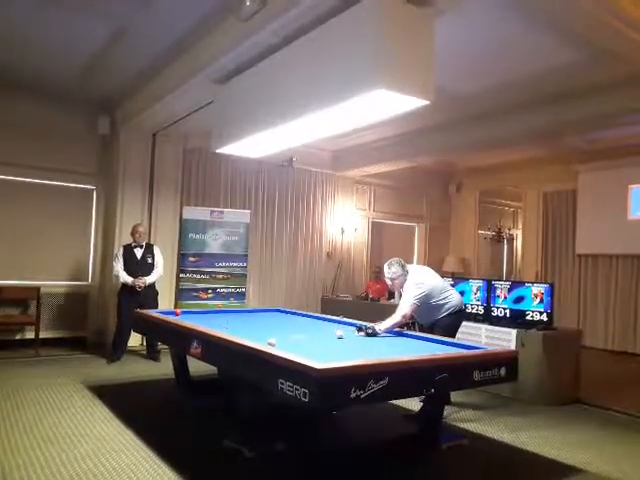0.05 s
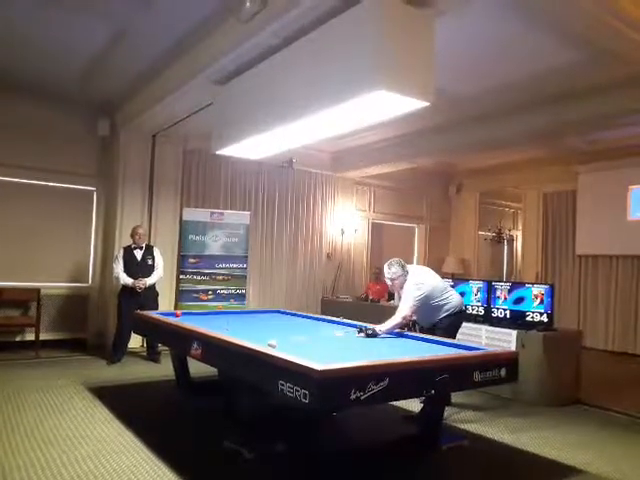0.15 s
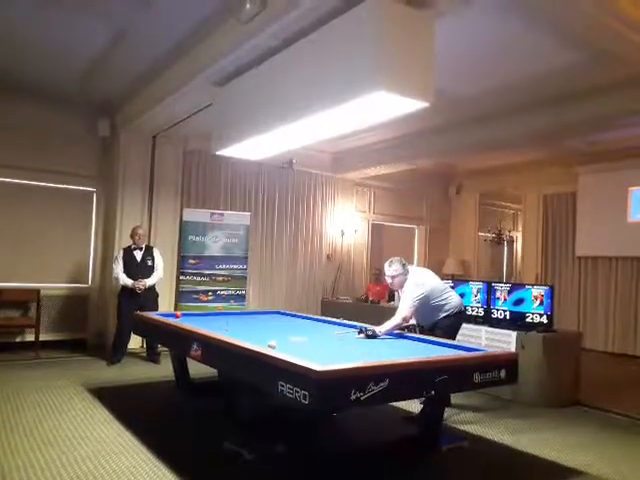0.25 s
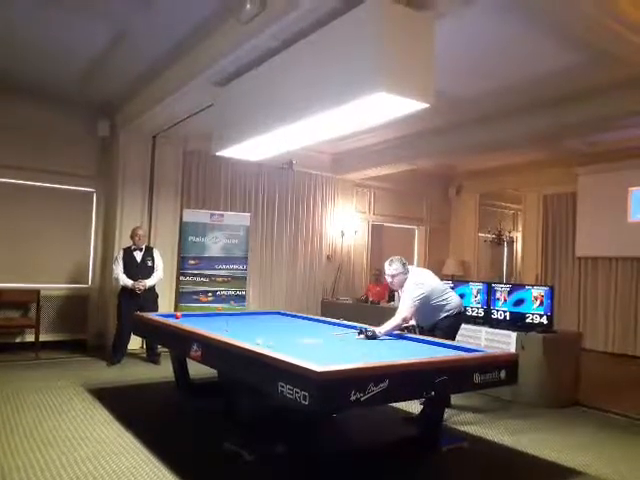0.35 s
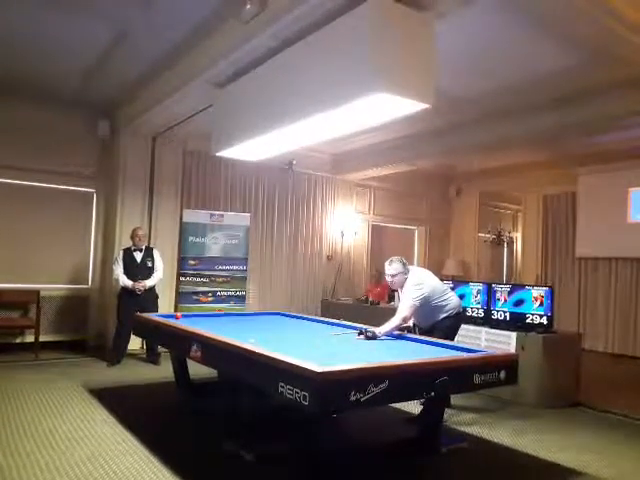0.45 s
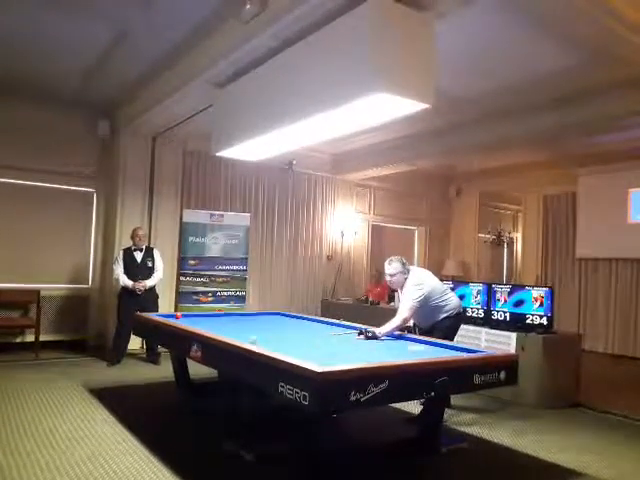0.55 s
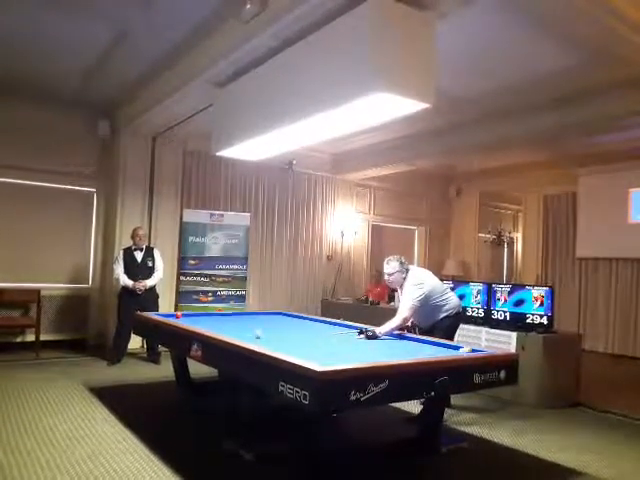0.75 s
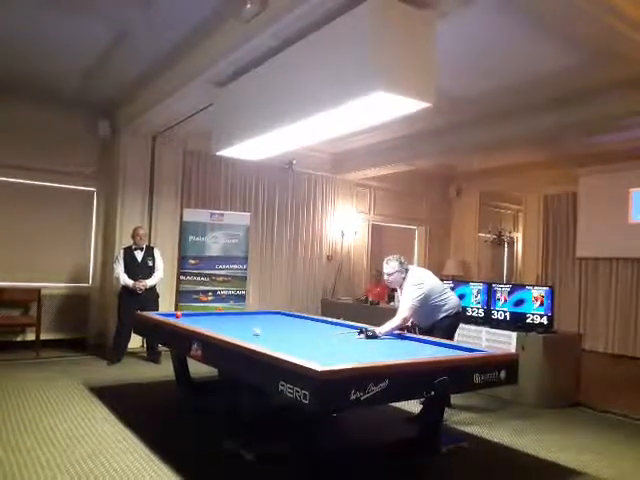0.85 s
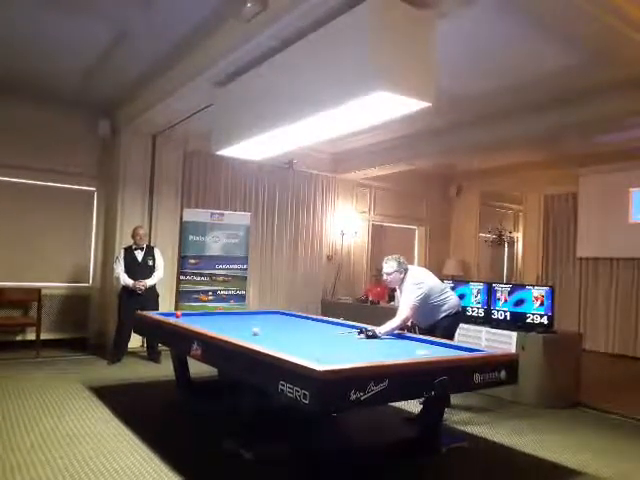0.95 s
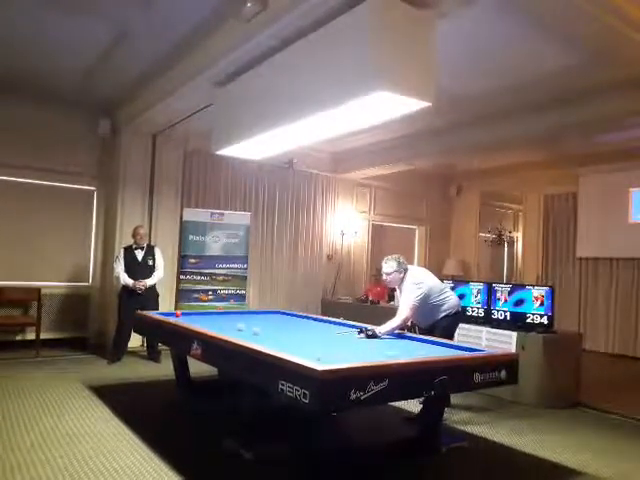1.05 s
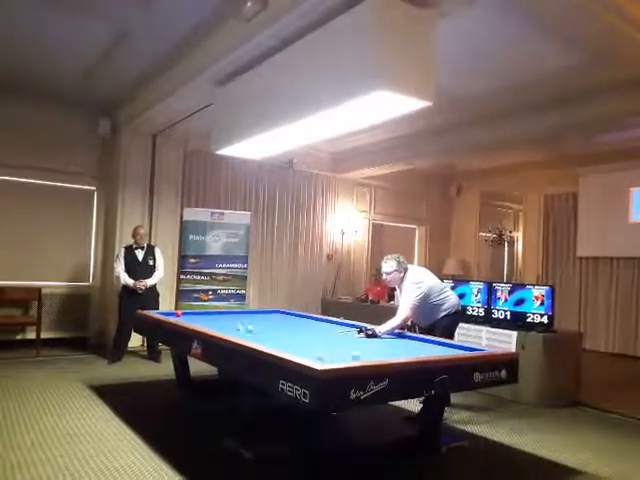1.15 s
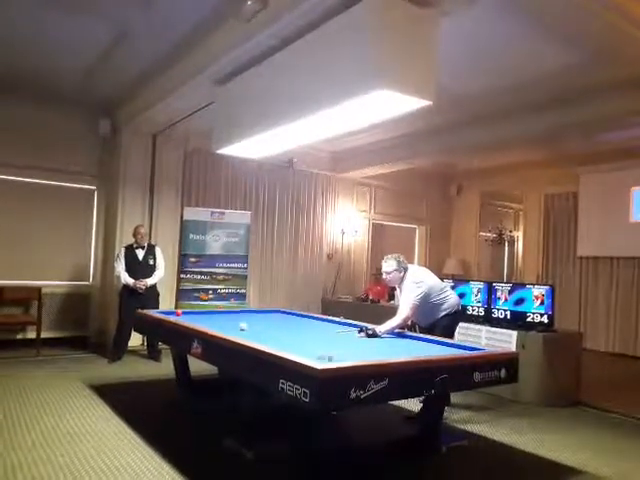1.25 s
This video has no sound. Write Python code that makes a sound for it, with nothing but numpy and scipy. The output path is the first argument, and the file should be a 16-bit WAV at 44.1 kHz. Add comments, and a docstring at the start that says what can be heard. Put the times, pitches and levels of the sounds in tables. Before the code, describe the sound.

A cue tip cracks against a billiard ball, then a sharp ball click and dull cushion knocks.

```python
"""Lamp hum and air in a carpeted hall, a faint tick, then a carom shot heard from a camera some metres off.
The cue tip strikes with a pressure jump and a ringing shaft; two balls click as a short air pulse.
One cushion knocks before the click and more after it: dull force pulses that ring the heavy table.
Echoes and a noise tail ring for a good half second; the camera clips peaks and slowly turns its gain down."""
import sys
import numpy as np
from scipy import signal
from scipy.io import wavfile
from scipy.ndimage import uniform_filter1d

SR = 44100
rng = np.random.default_rng(int(sys.argv[2]) if len(sys.argv) > 2 else 0)


def to_linear_factor(level_db):
    """Convert decibel levels (scalar or array-like) to linear amplitude factors."""
    exponent = np.asarray(level_db, float) / 20
    return 10 ** exponent


def master(y):
    """Save y as 16-bit WAV."""
    cut = np.clip(np.atleast_2d(y).T, -1, 1)
    pcm = np.round(cut * 32767)  # scale
    wavfile.write(sys.argv[1], SR, pcm.astype(np.int16))


N = 57330  # samples

# Cue strikes. Each row: start in seconds, level in dB, contact in seconds, pan (left over right) in dB.
CUE_STRIKES = [(0.2066, -6.5, .0008, 2.5)]
# Ball on ball. Each row: start in seconds, level in dB, pan (left over right) in dB.
BALL_CLICKS = [(0.3302, 3.5, 3.5)]
# Ball on cushion. Each row: start in seconds, level of the knock in dB, time scale of the contact in seconds,
# direct path in dB, table ring in dB relative to the knock, build-up of the hall in seconds.
CUSHION_KNOCKS = [(0.287, -25, 0.00024, -4, -9, 0.0013), (0.362, -14.5, 0.00032, -22, -7.5, 0.01),
                  (0.5125, -22, 0.00023, 12.5, -0.5, 0.0014), (0.620, -24, 0.00026, -8, -4.5, 0.0066),
                  (0.709, -28, 0.00036, 9.5, -6.5, 0.0033), (0.7571, -17.5, 0.000095, 6.5, -0.5, 0.003),
                  (0.7803, -24.5, 0.00036, 13.5, -5.5, 0.0026), (0.848, -20, 0.0003, -11, -8, 0.011),
                  (0.931, -30, .0002, -17, 3, 0.0035), (0.994, -30, 0.00079, -12.5, -5, 0.021)]
# Light ticks and rustles. Each row: start in seconds, level in dB, centre in Hz, t60 in seconds.
LIGHT_TICKS = [(0.13, -54.5, 1490, 0.36), (0.138, -81, 5000, 0.027), (1.250, -57.5, 8160, 0.047)]
# Modes of table frame and slate. Each row: frequency in Hz, relative level in dB, t60 in seconds.
TABLE_MODES = [(106.5, -8, 0.18), (156.8, -8, 0.25), (209.2, -8.5, 0.24), (244.1, 4, 0.076),
               (323, 0.5, 0.29), (411, -11, 0.093), (538.5, 12, 0.033), (629, -4, 0.13), (670, -23.5, 0.12),
               (816, -6, 0.092)]
# Modes of the cue shaft. Each row: frequency in Hz, relative level in dB, t60 in seconds.
SHAFT_MODES = [(600, 15, 0.13), (890, -4.5, 0.014), (2160, -30.5, 0.0067), (3960, -1.5, 0.06)]
# Single reflections. Each row: seconds after the direct sound, relative level left in dB, right in dB.
REFLECTIONS = [(.0019, -9, -16), (.0036, -10, -4), (.0053, -10, -14), (.0083, -12, -12), (.0144, -13, -13),
               (.0208, -12, -12), (.0265, -7, -7)]
# Tail of the hall. Each row: frequency in Hz, t60 in seconds, relative level in dB,
# likeness of left and right (0 to 1).
HALL_TAIL = [(93, 1, 1.5, .98), (231.8, 1, -1, .9), (637.6, 0.54, 0, 0.7), (1244, 0.31, 1, 0),
             (2400, 0.46, 0, 0), (4000, 0.51, -7, .05), (5680, .5, -8, 1), (7500, 0.38, 13.5, .05),
             (11500, .27, 1, .05), (16310, 0.17, -2.5, .05)]
# Ventilation noise. Each row: frequency in Hz, relative density in dB per Hz.
AIR_SPECTRUM = [(45, -53.5), (100, -7), (200, -21.5), (500, -21.5), (800, -25), (1200, -26), (2500, -36.5),
                (5000, -44), (9000, -56), (16000, -48.5)]
BANDS_HZ = 45 * 2 ** np.arange(0, 8.6, .5)  # half-octave centres


def column(table, hz, order):
    """A table column read on a log-frequency axis."""
    t = np.array(table, float)
    return np.interp(np.log(hz), np.log(t[:, 0]), t[:, order])


def band(x, hz, width_hz):
    """Resonance with gain 1 at its centre."""
    return signal.lfilter(*signal.iirpeak(min(hz, .45 * SR), hz / width_hz, SR), x)


def low(x, hz):
    """Steep low-pass."""
    return signal.sosfilt(signal.butter(4, hz, fs=SR, output="sos"), x)


def peak(x, db):
    """Scale to a peak level."""
    return x * to_linear_factor(db) / np.abs(x).max()


def push(at_s, contact_s, roundness):
    """Contact force: one hump, flatter on top for a small roundness."""
    u = np.clip((np.arange(N) / SR - at_s) / contact_s, 0, 1)
    return np.sin(np.pi * u).clip(0) ** roundness


def ring(force, modes, bloom_cycles=0):
    """A force rings modes, each with a chance share; they may build up over some cycles; peak is 1."""
    out = 0
    shares_db = 2 * rng.standard_normal(len(modes))
    for (hz, db, t60), share_db in zip(modes, shares_db):
        pole = np.exp(2j * np.pi * hz / SR - np.log(1000) / (t60 * SR))
        mode = signal.lfilter([1], [1, -pole], force)
        if bloom_cycles:
            # taking away a faster decay makes the mode start from nothing
            fast_pole = pole * np.exp(-hz / bloom_cycles / SR)
            mode = mode - signal.lfilter([1], [1, -fast_pole], force)
        out = out + to_linear_factor(db + share_db) * mode.imag
    return out / np.abs(out).max()


def crack(at_s, t60):
    """A short burst of bright noise: the slope of decaying white noise."""
    t = np.arange(N) / SR - at_s
    return np.gradient(rng.standard_normal(N) * (t > 0) * to_linear_factor(-60 * t.clip(0) / t60))


def cue(at_s, db, contact_s, pan_db):
    """The tip hits: a pressure jump as contact starts and ends; the shaft rings and rattles, leather cracks."""
    force = push(at_s, contact_s, .4)
    jump = peak(low(low(np.gradient(force), 3900), 4300), 0)
    shaft = to_linear_factor(-22) * ring(force, SHAFT_MODES)
    # summing the bright bursts takes their treble tilt away
    rattle = band(np.cumsum(crack(at_s + contact_s, .04)), 2500, 4000)
    rattle = peak(low(low(rattle, 4200), 4300), -10)
    leather = peak(np.cumsum(crack(at_s, 0.026)), -32.5)
    strike = peak(jump + shaft + rattle + leather, db)
    in_hall = hall(strike, pan_db, echo_db=-17, tail_db=-25, build_s=0.00069)
    return in_hall + table_answer(force, db - 14)


def click(at_s, db, pan_db):
    """Hard balls meet: a short resonant air pulse, a faint high ring of the ball and a little fizz."""
    pulse_hz, width_hz = 2178, 1800
    force = push(at_s, 0.00022, 0.56)
    pulse = band(band(force, pulse_hz, width_hz), pulse_hz, width_hz)
    pulse = peak(low(low(pulse, 5000), 5000), 0)
    blow = 1. * (force == force.max())  # the moment of greatest force
    ball = to_linear_factor(-32) * ring(blow, [(12400, 0, .003)])  # one mode: Hz, dB, t60 in seconds
    fizz = peak(np.cumsum(crack(at_s, .012)), -45)
    x = peak(pulse + ball + fizz, db)
    return hall(x, pan_db, echo_db=-7.0, tail_db=-19, build_s=0.042, early_db=-11.5)


def cushion(at_s, db, contact_s, direct_db, table_db, build_s):
    """Rubber takes the ball quickly and lets go slowly: a dull knock, thin in the bass, that rings the table."""
    u = (np.arange(N) / SR - at_s).clip(0) / contact_s
    force = u * np.exp(-u)
    knock = peak(low(band(np.gradient(force), 1100, 2600), 2280), db)
    in_hall = hall(knock, 1.3, echo_db=-7, tail_db=-15, build_s=build_s, direct_db=direct_db, dull_hz=2000)
    return in_hall + table_answer(force, db + table_db)


def table_answer(force, db):
    """The heavy table answers late, its bass last: each mode builds up over the same number of cycles."""
    return to_linear_factor(db) * ring(force, TABLE_MODES, bloom_cycles=5.4)


def tick(at_s, db, hz, t60):
    """A small light tick or rustle: a band of decaying noise."""
    return peak(band(crack(at_s, t60), hz, 0.3 * hz), db)


def pair(hz, like, size=N):
    """Left and right noise in a half-octave band, mixed from a shared and an opposed part."""
    mid, side = band(band(rng.standard_normal((2, size)), hz, hz / 2), hz, hz / 2)
    c = np.clip(like, 0, 1)
    return np.sqrt((1 + c) / 2) * mid + np.sqrt((1 - c) / 2) * side * np.array([[1], [-1]])


def hall(x, pan_db, echo_db, tail_db, build_s, direct_db=0, early_db=-40, dull_hz=19000):
    """Direct sound, single reflections and a dense tail that builds up and dies band by band."""
    t = np.arange(N // 2) / SR
    paths = np.zeros((2, len(t)))
    paths[:, 0] = to_linear_factor(direct_db)
    for s, left_db, right_db in REFLECTIONS:
        paths[:, int(s * SR)] = to_linear_factor(direct_db + echo_db + np.array([left_db, right_db]))
    tail = 0
    for hz in BANDS_HZ:
        noise = pair(hz, column(HALL_TAIL, hz, order=3), size=len(t))
        fade_db = column(HALL_TAIL, hz, order=2) - 60 * t / column(HALL_TAIL, hz, order=1)
        tail = tail + noise * to_linear_factor(fade_db)
    # the tail grows from early_db to its full level
    build_up = 1 - (1 - to_linear_factor(early_db)) * np.exp(-(t / build_s) ** 2)
    response = low(paths, dull_hz) + to_linear_factor(tail_db) * build_up * (t > .0012) * tail
    balance = to_linear_factor(np.array([[pan_db], [-pan_db]]) / 2)
    return signal.fftconvolve(x[None], response)[:, :N] * balance


def air():
    """Ventilation noise in half-octave bands and a lamp hum wavered by narrow noise at its own pitch."""
    air_db, hum_hz, hum_db = -54.5, 100, -58  # noise rms; steady part of the hum, peak
    noise = sum(to_linear_factor(column(AIR_SPECTRUM, hz, order=1)) * pair(hz, column(HALL_TAIL, hz, order=3))
                for hz in BANDS_HZ)
    steady = np.sin(2 * np.pi * hum_hz * np.arange(N) / SR)
    waver = 20 * band(rng.standard_normal(N), hum_hz, 10)
    return to_linear_factor(air_db) * noise / noise.std() + to_linear_factor(hum_db) * (steady + waver)


def scene():
    """Everything at the camera; its small microphones drop the deep bass of the knocks."""
    mic_low_hz = 92.5
    knocks = sum(cue(*r) for r in CUE_STRIKES) + sum(click(*r) for r in BALL_CLICKS)
    knocks = knocks + sum(cushion(*r) for r in CUSHION_KNOCKS) + sum(tick(*r) for r in LIGHT_TICKS)
    return signal.sosfilt(signal.butter(4, mic_low_hz, "high", fs=SR, output="sos"), knocks) + air()


def band_limit(x):
    """A steep low-pass at the top of the band."""
    return signal.sosfilt(signal.butter(12, 16840, fs=SR, output="sos"), x)


def record(dry):
    """Gain control holds the loudest level so far and slews down towards its aim; peaks clip softly."""
    top_db, slope, slew_s = -34, 0.74, 0.78  # threshold, dB cut per dB over it, time constant
    power = uniform_filter1d(np.mean(dry ** 2, axis=0), size=2048, origin=1023)
    level_db = 10 * np.log10(power + 1e-12)
    aim_db = -slope * np.maximum.accumulate((level_db - top_db).clip(0))
    a = np.exp(-1 / (slew_s * SR))
    x = dry * to_linear_factor(signal.lfilter([1 - a], [1, -a], aim_db))
    clipped = x / (1 + np.abs(x / .97) ** 10) ** (1 / 10)
    return band_limit(clipped)


dry = scene()
out = record(dry)
master(out)
```